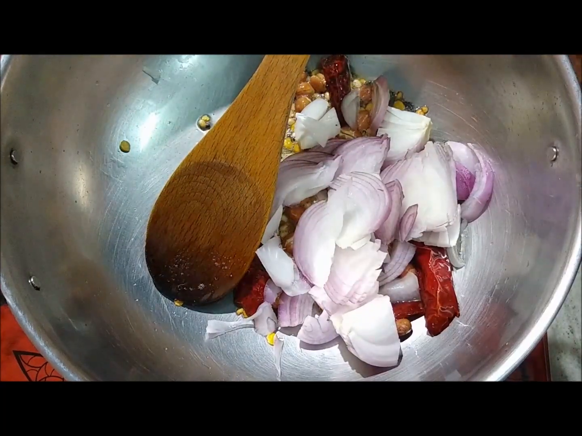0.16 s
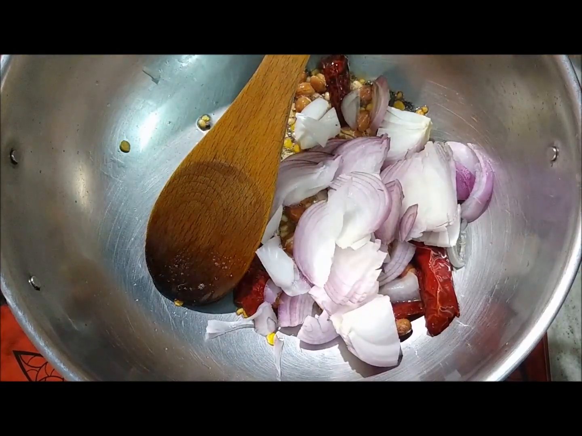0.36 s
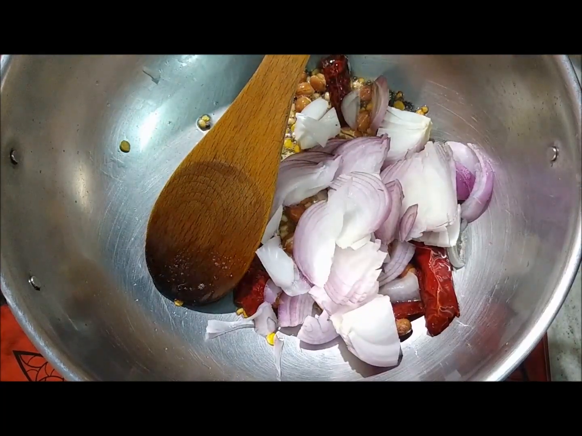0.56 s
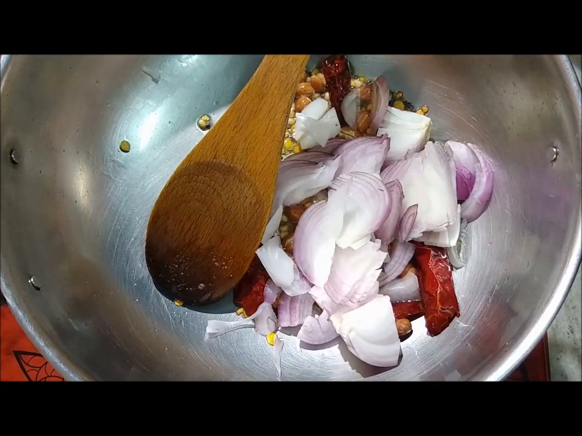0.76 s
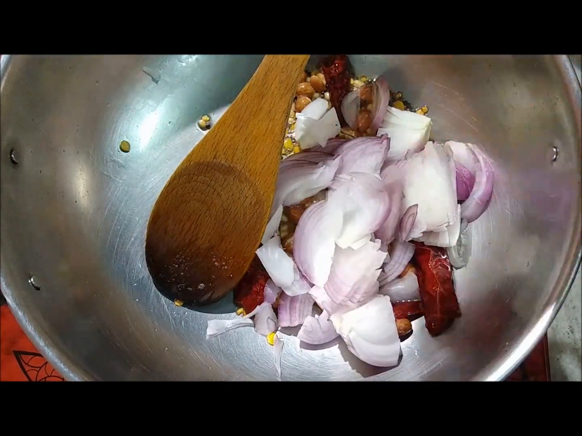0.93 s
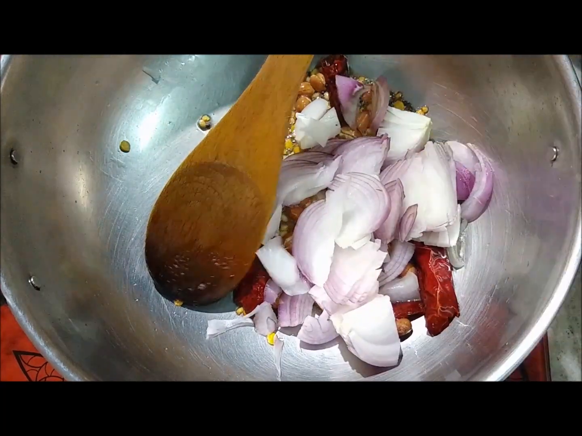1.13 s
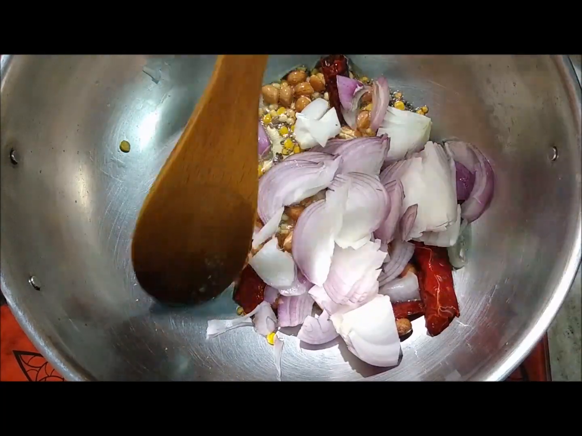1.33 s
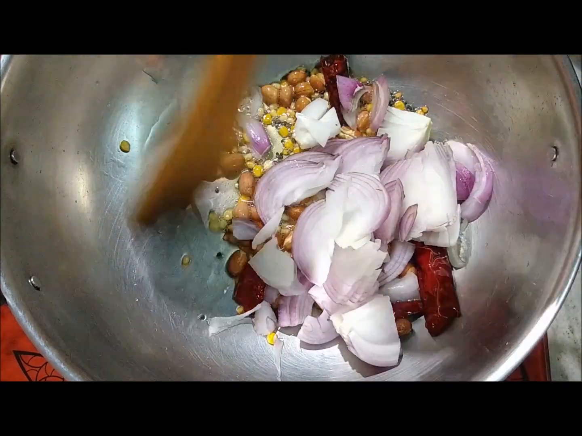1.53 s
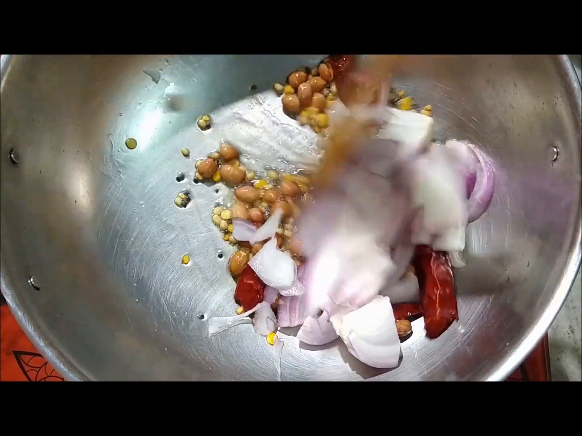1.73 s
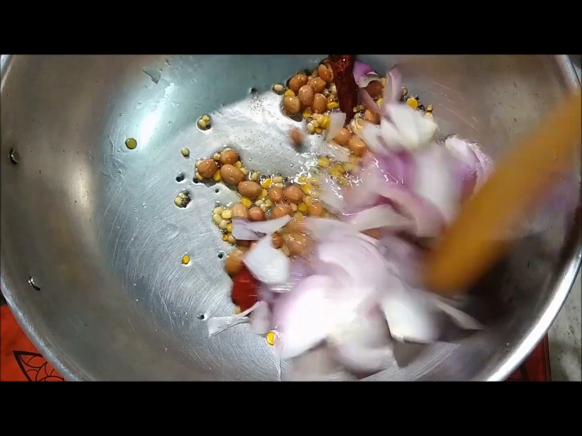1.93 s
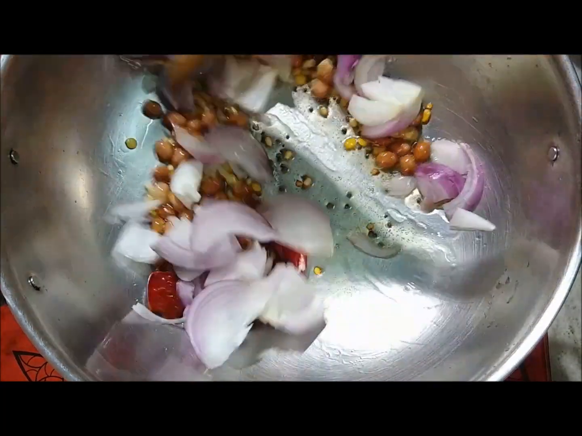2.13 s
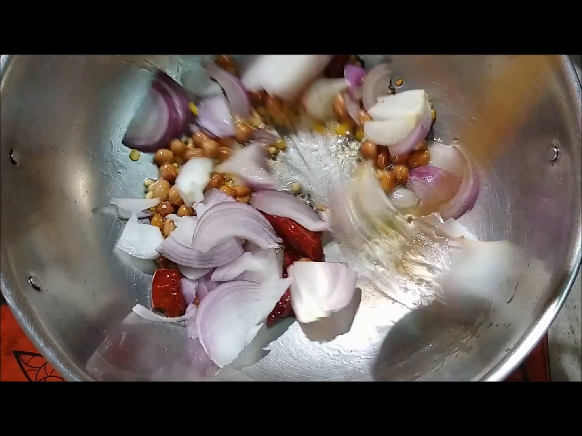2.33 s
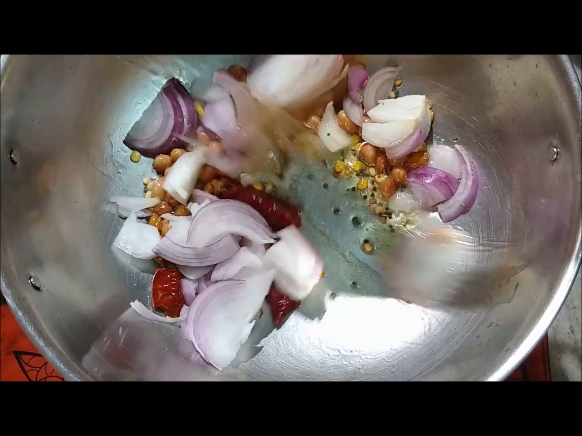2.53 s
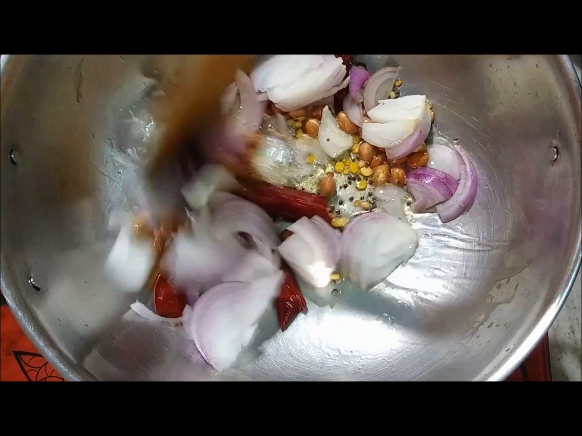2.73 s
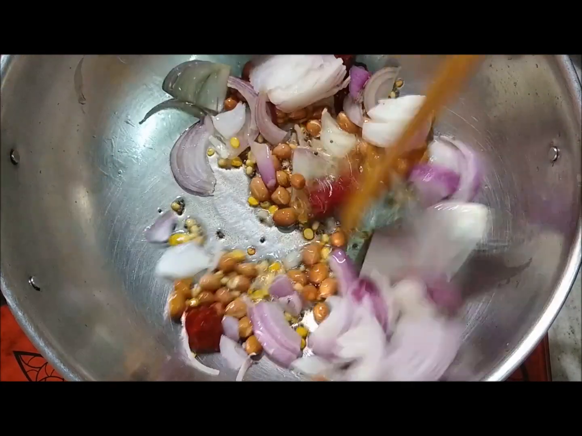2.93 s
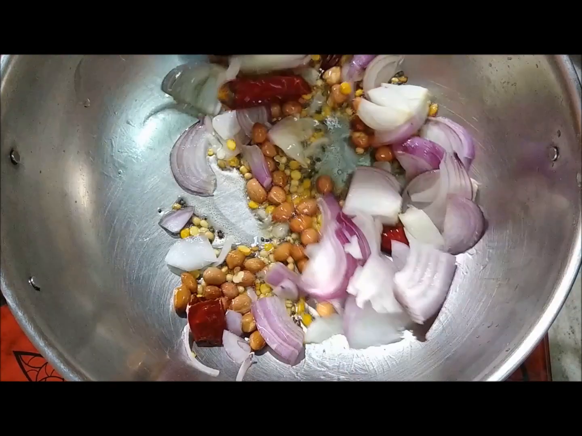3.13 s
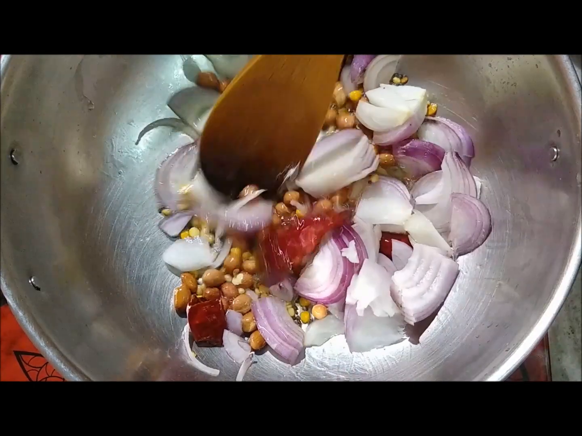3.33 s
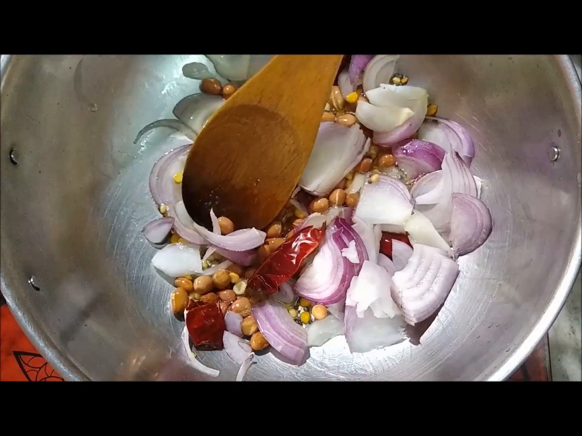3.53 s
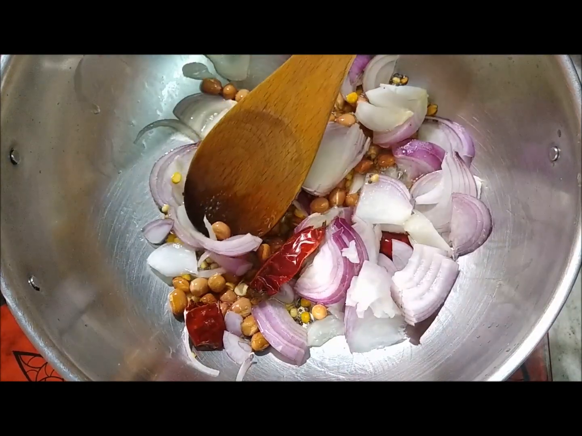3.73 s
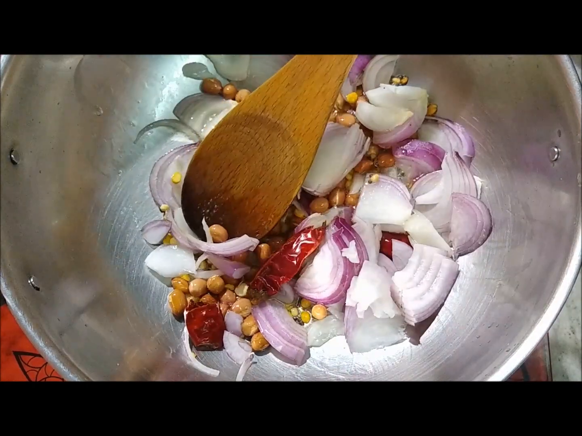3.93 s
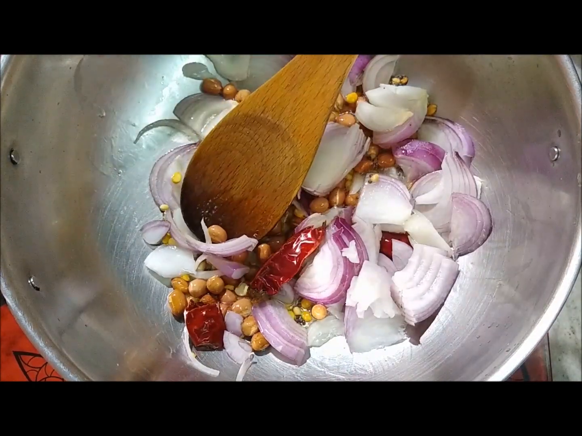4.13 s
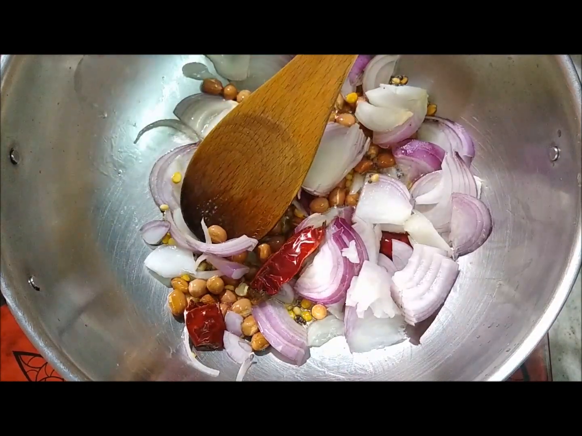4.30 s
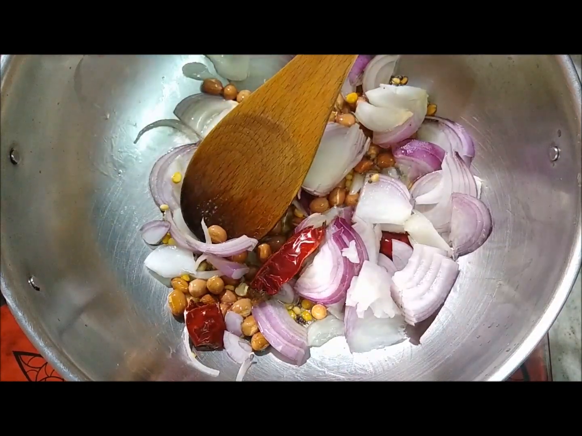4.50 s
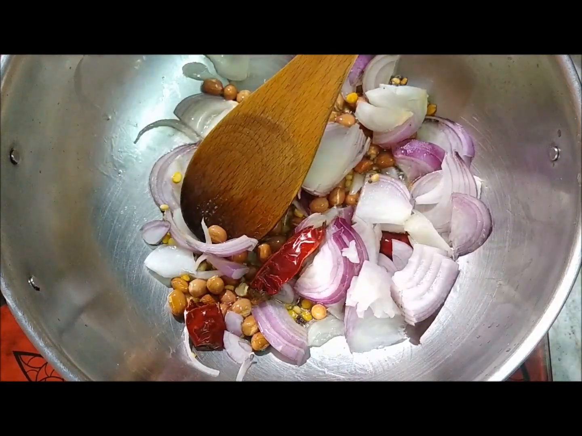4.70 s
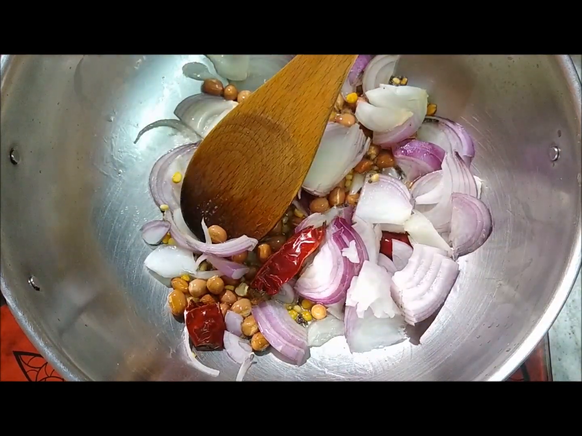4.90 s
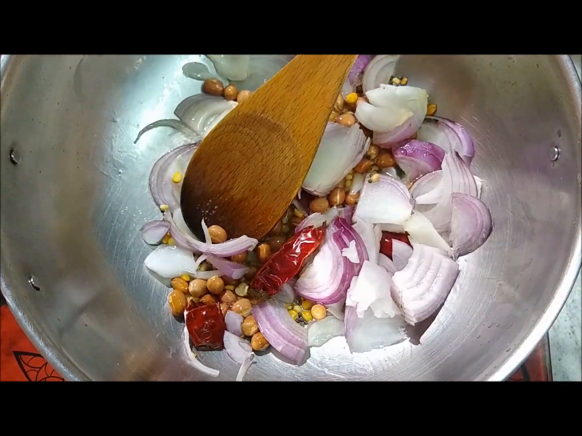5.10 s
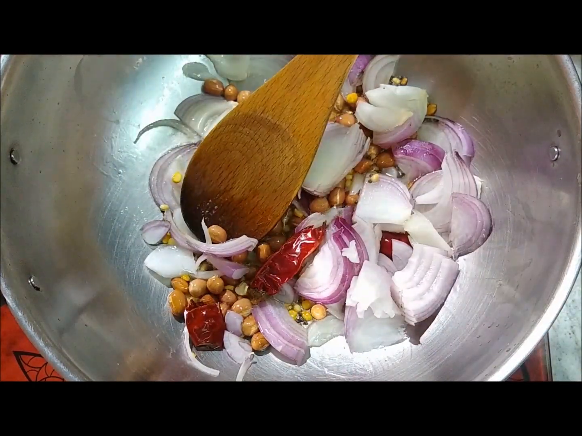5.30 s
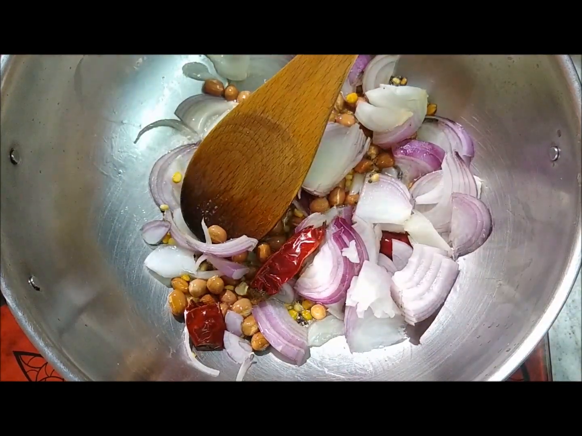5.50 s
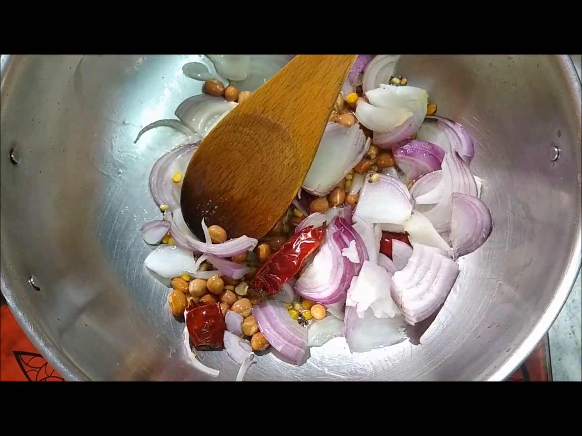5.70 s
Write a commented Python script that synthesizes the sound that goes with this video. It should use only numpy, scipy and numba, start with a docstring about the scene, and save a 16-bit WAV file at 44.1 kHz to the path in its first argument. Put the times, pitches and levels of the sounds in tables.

```python
"""Onions frying in a steel pan

Onions sizzle in hot oil just under a phone; a wooden spoon scrapes and knocks the pan while stirring.
Steam bubbles crackle and spit as damped sines; now and then one bursts as a pressure step with a thump.
Spoon contacts thud and set the pan modes ringing; loud peaks make the phone cut its gain, which creeps back.
Each channel is one port minus the other, delayed, so sounds cross over late and reversed; most come from
the right. A low murmur of burner and room lies underneath."""
import sys
import numpy as np
from scipy import signal
from scipy.fft import rfft, irfft, next_fast_len
from scipy.io import wavfile
from scipy.ndimage import uniform_filter1d
from numba import njit

SR = 44100
rng = np.random.default_rng(int(sys.argv[2]) if len(sys.argv) > 2 else 0)


def store_wav(level_fs):
    """Save 16-bit WAV to argv[1]."""
    pcm = np.round(np.clip(np.atleast_2d(level_fs), -1, 1) * 32767)
    wavfile.write(sys.argv[1], SR, pcm.T.astype(np.int16))


N = 253575

# ringing modes of the pan, low and high: (f/Hz, level/dB, t60/s)
LOW_MODES = [(325.3, -11, 0.22), (520, 1.5, 0.052), (639, -1, 0.038), (672, -6, 0.69), (753, -2, 0.083),
             (864, -7.5, 0.1), (925, -19.5, 0.083), (1310, -4.5, 0.13)]
HIGH_MODES = [(1567, -14, .12), (2062, -12, .2), (2620, -14, .1), (2945, -2, .22), (3009, -6, .25),
              (3203, -1, .2), (3245, -4, .15), (3300, -10, .15), (3390, -14, .1), (3758, -10, .15),
              (3908, -11, .15), (4750, -16, .1)]
LAG = 20  # samples by which sound from the right reaches the left port later


def frying():
    """Crackle over a seethe of tiny bubbles, fine hiss with flecks of spray, and the drone they raise in the pan."""
    # frying over time: (t/s, crackle level/dB, fine hiss over crackle/dB, pan drone over crackle/dB)
    fry = [(0, -55, -4, 17), (.04, -51, -16, 5.5), (.09, -57.5, -5, -14), (.125, -38, -13, -5),
           (.2, -51, -4, 0), (.3, -52, -1, -1), (.43, -46, -0.5, -8.5), (.6, -53.5, 2, -9),
           (.78, -49, 2, -7.5), (.9, -54.5, 4, -5.5), (1.2, -50.5, 1, -8), (1.55, -51.5, 1, -6),
           (1.7, -53.5, 8.5, -13), (1.83, -43.5, -13, 0), (1.9, -41.5, -1.5, -35), (2.07, -48, 1, -12.5),
           (2.34, -44.5, -0.5, -3.5), (2.55, -44, 1, -5.5), (2.7, -45, 0.5, -10.5), (2.95, -47, -3, -9.5),
           (3.2, -48, -1.5, -13), (3.55, -44, -2.5, -9), (3.75, -49, -1, -6), (4.2, -46.5, 1.5, -7),
           (4.4, -44.5, -3, -9.5), (5.15, -50, 0.5, -10), (5.75, -48, -0.5, -9)]
    # colour of the crackle: (f/Hz, level/dB)
    crackle_colour = [(900, -24), (1500, -11.5), (2100, -6.5), (2900, -0.5), (4000, -15.5), (5500, -0.5),
                      (8000, -13.5), (11000, -2.5)]
    # colour of the seethe: (f/Hz, level/dB)
    seethe_colour = [(450, -11.5), (700, 0.5), (1300, -11), (2100, 7), (2900, 1.5), (4200, 8.5),
                     (6000, -6.5), (9000, -23)]
    # colour of the hiss: (f/Hz, level/dB)
    hiss_colour = [(1500, -19.5), (3000, -1.5), (5000, -1), (8000, -5.5), (11000, -8), (14000, -6),
                   (15500, -10.5)]
    drone_colour = [(350, -21.5), (700, 5.0), (1300, 5.0), (1750, -4), (2300, -23)]
    crackle_db, hiss_db, drone_db = curves(fry)
    noise = rng.standard_normal((5, N))

    boil = crackle(count=5000, lo_hz=1120.0, hi_hz=9060.0, cycles=2.34, spread_db=4.0, scatter=3.0, clump_db=2.2)
    boil = unit(colour(boil, crackle_colour))

    seethe = ports(noise[0], 0.27, noise[1])
    seethe = unit(colour(seethe * undb(2.2 * walk(60) + 3.2 * walk(350)), seethe_colour))

    # about 380 flecks a second, each fading over 1.4 ms
    flecks = (rng.random(N) < 380 / SR) * undb(4.87 * rng.exponential(size=N).clip(0, 4))
    flecks = signal.lfilter([1], [1, -np.exp(-1 / (0.0014 * SR))], flecks)
    gate = undb(2.2 * walk(45)) + undb(-8.0) * flecks
    # spray lands all over the pan, so part of it is unrelated at the two ports
    mist = ports(noise[2], 0.25, noise[3]) + undb(1.) * rng.standard_normal((2, N))
    hiss = unit(colour(gate * mist, hiss_colour))

    shake = noise[4] * undb(3.1 * walk(50) + 3.3 * walk(250))
    drone = undb(-10.5) * unit(ring(shake, LOW_MODES)) + unit(colour(shake, drone_colour))

    wet = undb(-2.72) * boil + undb(-0.5) * seethe + undb(drone_db) * drone
    return undb(crackle_db + .5 * walk(20)) * (wet + undb(hiss_db) * hiss)


def crackle(count, lo_hz, hi_hz, cycles, spread_db, scatter, clump_db):
    """A swarm of small bubbles, a few louder, that come in clumps."""
    moment, pitch, loudness, place, lag_scatter, length = rng.random((count, 6)).T
    s = (40 + moment * (N - 140)) / SR
    clump = clump_db * walk(45)[(s * SR).astype(int)]
    db = -spread_db * np.log(loudness + 0.0036) + clump
    hz = lo_hz * (hi_hz / lo_hz) ** pitch
    left_share = .28  # bubbles that reach the left port first
    lag = LAG * np.sign(1 - left_share - place) + scatter * (lag_scatter - .5)
    return unit(bubbles(s, hz, cycles * (.5 + length), db, 8 * (place - .5), lag))


def bubbles(s, hz, cycles, db, pan_db, lag, glide=0.073, rise=2.8):
    """Damped sines at both ports; each bubble lies elsewhere in the pan, so has its own lag and balance."""
    # a bubble that swells in rings shorter and starts stronger
    open_share, swell_db = 0.71, 4.5
    decay = hz / SR / np.clip(open_share * cycles, .3, 40)
    left_size = -undb(db + swell_db + pan_db / 2)
    right_size = undb(db + swell_db - pan_db / 2)
    left = grains(N, s * SR + lag, hz, decay, left_size, glide, rise)
    right = grains(N, s * SR, hz, decay, right_size, glide, rise)
    return np.array([left, right])


@njit
def grains(n, at, hz, decay, size, glide, rise):
    """Damped sines that swell in quickly and rise in pitch, faster the shorter they ring."""
    y = np.zeros(n)
    for g in range(len(at)):
        start = int(at[g]) + 1
        w = 2 * np.pi * hz[g] / SR
        # starting between samples keeps the lag exact
        z = size[g] * np.exp((1j * w - decay[g]) * (start - at[g]))
        step = np.exp(1j * w - decay[g])
        turn = np.exp(1j * w * glide * decay[g])
        shut = 1.
        for k in range(start, min(n, start + int(6 / decay[g]))):
            shut *= 1 - min(rise * decay[g], 1.)
            y[k] += z.imag * (1 - shut)
            z *= step
            step *= turn
    return y


def spits():
    """Each loud bubble snaps open and rings a few cycles; each spray is a short burst of bright noise."""
    # loudest single bubbles: (t/s, level/dB, f/Hz, ring/cycles, left over right/dB)
    loud_bubbles = [(0.1168, -22, 3360, 1.4, -3), (0.369, -29.5, 2570, 5, 5),
                    (0.3879, -16, 1210, 0.38, -0.5), (1.07, -29.5, 3270, 1.2, -3),
                    (0.4215, -33, 1240, 0.5, 4), (0.635, -32, 5170, 2.2, 5), (0.661, -29, 7200, 3.9, 3),
                    (0.664, -31, 5200, 6, -1), (0.6872, -22, 1490, 0.38, 1), (0.693, -29, 5000, 0.99, 0),
                    (0.699, -28.5, 8000, 12, -3), (0.764, -34, 4000, 3, 3), (0.775, -25, 4630, 3, 0),
                    (0.876, -34, 5730, 6.6, -7), (1.1636, -29, 3440, 0.87, 3), (0.789, -23.5, 4450, 5.8, 4),
                    (1.056, -26.5, 3430, 0.97, 2), (1.135, -31.5, 1300, 4.2, -1),
                    (1.3485, -18, 2575, 5.7, 2.5), (1.3985, -12.5, 2580, 3.6, -0.5),
                    (1.8425, -18.5, 1400, 4.1, 2.5), (1.906, -18, 3000, 8.7, 4), (1.972, -23, 2960, 3, 4.5),
                    (1.951, -28, 3080, 8.4, 0), (1.9847, -20.5, 2520, 5.3, 0), (2.287, -29, 3420, 2.1, -5),
                    (2.3948, -20.5, 3600, 5.5, 6.5), (2.5398, -25, 5500, 7.2, -3),
                    (2.58, -26, 3760, 4.3, 1.5), (2.607, -30.5, 3760, 6.9, -9), (2.84, -29, 3360, 4.3, -3),
                    (3.542, -34, 3400, 1.5, 10), (3.578, -30, 3470, 4.4, 2), (3.5225, -35.5, 3100, 7.1, 1),
                    (3.973, -30, 6940, 4.5, -2), (4.152, -32.5, 1260, 0.71, 5),
                    (4.4854, -31, 2840, 1.1, 12), (4.518, -23, 6600, 1.8, -1), (4.526, -24, 6460, 2.7, -4),
                    (4.858, -34, 5500, 1.8, 4), (5.317, -34, 3463, 8.1, 0), (5.563, -30, 5600, 5.4, -8.5),
                    (3.1402, -23, 1387, 0.55, 0), (3.256, -31.5, 3120, 5.2, -7),
                    (3.454, -25, 3340, 2.8, -1), (3.57, -24.5, 3300, 1.6, -1.5), (3.629, -25, 3660, 2, -2),
                    (3.9571, -30, 2500, 2.9, -6), (4.1232, -26.5, 3450, 1.2, 3.5),
                    (4.255, -29, 2670, 3.4, -2.5), (4.4114, -29.5, 1330, 2.4, -5),
                    (4.55, -21.5, 980, 1, -1.5), (4.684, -33, 1410, 2, 3.5), (4.785, -29, 2830, 1.9, 5),
                    (4.9513, -22, 3160, 7.9, 3), (4.9927, -31, 3320, 6.1, -8.5),
                    (5.031, -23.5, 3970, 9.4, 5), (5.045, -28, 3350, 7.4, -3), (5.218, -33, 3200, 5.2, 1),
                    (5.273, -27, 3430, 3.3, -2), (5.3011, -26, 3320, 2.7, -1),
                    (5.3709, -15, 1970, 0.88, -2), (5.44, -24, 3500, 0.78, 1.5), (5.537, -28, 1160, 0.8, 0),
                    (5.625, -31, 3300, 4.4, -10), (5.7255, -26, 4000, 7.9, -1)]
    # loudest sprays of oil: (t/s, level/dB, left over right/dB)
    sprays = [(0.6913, -31, 0.5), (0.88, -27, 2), (1.017, -39.5, 10), (1.1516, -32, 6), (1.326, -36, 0),
              (1.351, -39, 8), (1.4544, -38, 1), (1.5026, -40, -3), (1.5725, -32.5, -4), (1.635, -34, 4),
              (1.6637, -29, 1), (1.7428, -23.5, 2.5), (2.122, -26.5, 4), (2.141, -34, 7),
              (2.4034, -21.5, -4), (2.453, -22, 8), (2.5005, -21.5, -8), (2.522, -28, 4), (2.643, -30, 2),
              (2.701, -26, 4), (2.826, -28.5, 9), (2.897, -33, -14), (3.0226, -36, 0), (3.626, -30, 6),
              (3.8515, -42, 6), (3.9584, -31, -7), (4.2712, -36, 13), (5.11, -27, 0), (5.3719, -30, -2),
              (5.439, -30.5, -2)]
    snap_colour = [(500, -24.5), (1200, -2.0), (4000, 2.5), (10000, -19.5)]
    spray_colour = [(1500, -39.5), (3500, 1.5), (5500, 7.0), (9000, -3.0), (15000, -1.5)]

    # smaller spits at random moments
    moment, pitch, length, place = rng.random((160, 4)).T
    stray_hz = 3600 * 6.9 ** (pitch ** 0.676 - .55)
    stray = [moment * (N - 500) / SR, np.full(160, -40.), stray_hz, 8.4 * (.5 + length), 8 * (place - .5)]
    s, db, hz, cycles, pan_db = np.hstack([np.transpose(loud_bubbles), stray])
    rings = bubbles(s, hz, cycles, db, pan_db, LAG + rng.standard_normal(len(s)))
    snaps = bursts(s, db - 8, 1, pan_db, snap_colour)

    s, db, pan_db = np.transpose(sprays)
    return rings + snaps + bursts(s, db, 0.89, pan_db, spray_colour)


def bursts(s, db, ms, pan_db, points):
    """Short decaying bursts of coloured noise, partly unrelated at the two ports."""
    gate = np.zeros((2, N + 400))
    fall = np.exp(-np.arange(380) * 1000 / SR / ms)
    for i, right, left in zip((s * SR).astype(int), db - pan_db / 2, db + pan_db / 2):
        gate[0, i + LAG:][:len(fall)] += undb(left) * fall
        gate[1, i:][:len(fall)] += undb(right) * fall
    noise = rng.standard_normal((2, N))
    return gate[:, :N] * unit(colour(ports(noise[0], 0.41, noise[1]), points))


def pops():
    """Steam bursts: a sudden step of pressure that leaks away; the port swings back with a low thump."""
    # steam bursts: (t/s, level/dB, push +1 or pull -1, fall/ms, thump over level/dB)
    steam_bursts = [(0.0163, -4, 1, 0.85, -5), (2.498, -23, 1, 0.44, 12), (2.6889, -10.5, 1, 0.57, 14),
                    (2.8267, -21.5, 1, 1, 19), (2.8974, -10.5, -1, 0.98, -23), (2.678, -30, 1, 1, 18),
                    (4.2713, -18.5, 1, 1.6, -25), (4.2735, -5.5, 1, 1.36, -3), (4.9122, -18.5, 1, 0.86, 16)]
    out, t = np.zeros(N), np.arange(3000) / SR
    for s, db, sign, fall_ms, thump_db in steam_bursts:
        jump = (1 - np.exp(-t / .00006)) * np.exp(-t * 1000 / fall_ms)
        thump = -.3 * undb(thump_db) * np.sin(2 * np.pi * 115 * t) * np.exp(-t / 0.0045)
        debris = 0.017 * rng.standard_normal(len(t)) * np.exp(-t / 0.0041)
        burst = 1.771 * jump + thump + dull(debris, 2260.0)
        out[int(s * SR):][:len(t)] += sign * undb(db) * burst
    # the port leaks slow pressure
    out = signal.sosfilt(signal.butter(2, 72., "high", fs=SR, output="sos"), out)
    left, right = ports(out)
    return np.array([undb(-4.0) * left, right])


def spoon():
    """Knocks and strokes of the wooden spoon; thuds, low ring and rumble reach both ports alike."""
    thud, low, high = knocks()
    rumble, rasp = scrapes()
    body = thud + low + rumble
    # wood on a thin pan moves no air at the lowest pitches
    body = signal.sosfilt(signal.butter(4, 135., "high", fs=SR, output="sos"), body)
    return body + ports(ring(high, HIGH_MODES)) + rasp


def knocks():
    """Wood thuds while it touches, the pan rings on; returns thud, low ring and the taps for the clang."""
    # spoon on pan: (t/s, thud level/dB, thud f/Hz, contact/ms, ring over thud/dB, clang over thud/dB)
    contacts = [(1.399, -49, 910, 1.6, -23, 6), (1.6, -32.5, 402, 1.3, -20, -35),
                (1.651, -33.5, 387, 1.3, -33.5, -38), (1.684, -45, 675, 0.46, 9, 7),
                (1.8425, -14, 531, 2.9, -12.5, -48), (1.8495, -17, 655, 3.8, -38.5, -40.5),
                (1.868, -14.5, 688, 3.6, -25, -10.5), (1.913, -23, 720, 3.8, -38, -18),
                (1.939, -40, 600, 2.2, -26, -32), (2.101, -37.5, 361, 23, -35.5, -9),
                (2.319, -43, 833, 8.8, -9, -11.5), (2.3944, -9.5, 723.3, 9.6, -19, -46),
                (2.595, -13.5, 675, 1.3, -25, -32.5), (2.850, -20.5, 644.4, 1.1, -17.5, -38),
                (3.111, -38, 630, 2.7, -7, -46), (3.802, -37.5, 691, 18.6, -18, -36)]
    near_db_per_octave = 38  # a knock rings most the modes near its own pitch
    thud, low, high, t = np.zeros(N), np.zeros(N), np.zeros(N), np.arange(4000) / SR
    tap = 1. * (np.arange(SR // 2) == 0)
    for s, db, hz, touch_ms, ring_db, clang_db in contacts:
        i, touch = int(s * SR), touch_ms / 1000
        attack = np.clip(t / (0.00049 + 0.42 * touch), 0, 1) ** 0.51
        release = np.exp(-np.clip(t - touch, 0, 1) / 0.0017)
        chatter = 1 + .6 * dull(rng.standard_normal(len(t)), 500.)
        tone = np.sin(2 * np.pi * hz * t) + undb(-19.5) * np.sin(2 * np.pi * 2.06 * hz * t)
        thud[i:i + len(t)] += undb(db) * attack * release * chatter * tone
        near = [(f, d - near_db_per_octave * abs(np.log2(f / hz)), t60) for f, d, t60 in LOW_MODES]
        low[i:i + len(tap)] += undb(db + ring_db) * ring(tap, near)
        high[i] += undb(db + clang_db)
    return thud, low, high


def scrapes():
    """Dragging is uneven friction into the pan modes, with wood noise below and metal rasp above."""
    wood_colour = [(110, -8.0), (300, 3.5), (800, -3.5), (1600, -10.5), (2600, -29.0)]
    rasp_colour = [(900, -7.0), (3000, -3.5), (6000, -17), (12000, -34.0)]
    drag, drag_rasp = strokes()
    slip_db = 4 * walk(150) + 1.5 * walk(40)  # the spoon sticks and slips
    grit = rng.standard_normal((4, N)) * undb(slip_db)
    wood = unit(colour(grit[1], wood_colour))
    rumble = unit(ring(grit[0], LOW_MODES)) + undb(1.0) * wood
    metal = ports(grit[2], 0.39, grit[3])
    rasp = unit(ring(metal, HIGH_MODES)) + undb(11.0) * unit(colour(metal, rasp_colour))
    return drag * rumble, drag_rasp * rasp


def strokes():
    """Each stroke bites quickly, holds, then fades; returns the strength of rumble and of rasp."""
    # spoon dragged through the food: (t/s, rumble level/dB, hold/s, metal rasp over rumble/dB)
    drags = [(1.604, -54, 0.073, -32), (1.672, -62.5, 0.061, 3), (1.839, -31, 0.0051, -17.5),
             (1.863, -38, 0.037, -4.5), (2.084, -46, 0.032, -13), (2.13, -55.5, 0.14, -15.5),
             (2.3, -53, 0.16, -10), (2.378, -47, 0.015, -7.5), (2.593, -38.5, 0.016, -16),
             (2.833, -41.5, 0.013, -21.5)]
    attack_s, fade_db_per_s = 0.0045, 158
    s, db, hold, rasp_db = np.transpose(drags)[..., None]
    since = np.arange(N) / SR - s
    fade_db = fade_db_per_s * np.clip(since - hold, 0, 2)
    drag = np.clip(since / attack_s, 0, 1) * undb(db - fade_db)
    return drag.sum(axis=0), (drag * undb(rasp_db)).sum(axis=0)


def kitchen():
    """Low murmur of burner and room, unrelated at the two ports, and a faint low tone that comes and goes."""
    # colour of the murmur: (f/Hz, level/dB)
    murmur_colour = [(25, -25), (45, -29.5), (63, 2.5), (95, -36), (150, 0), (220, -10.5), (350, -5),
                     (600, -12), (1200, -19.5)]
    # faint low tones: (t/s, f/Hz, length/s, level/dB)
    hums = [(0.142, 316, 0.35, -57), (2.583, 302, 0.5, -56), (5.047, 363, 0.19, -60),
            (5.402, 380, 0.042, -55.5)]
    murmur = unit(colour(rng.standard_normal((2, N)), murmur_colour))
    out = undb(-61.5 + 0.75 * walk(16.0)) * murmur
    time = np.arange(N) / SR
    waver = 1.2 * walk(70)  # radians
    for s, hz, length, db in hums:
        swell = np.sin(np.pi * np.clip((time - s) / length, 0, 1))
        out += undb(db) * swell * np.sin(2 * np.pi * hz * time + waver)
    return out


def ring(push, modes):
    """A push sets each mode ringing: one damped complex resonator per mode."""
    out = 0
    for hz, db, t60 in modes:
        pole = np.exp(2j * np.pi * hz / SR - np.log(1000) / (t60 * SR))
        out = out + undb(db) * signal.lfilter([1], [1, -pole], push).imag
    return out


def ports(x, apart=0., other=0.):
    """Sound from the right reaches the left late and reversed; a share from the left crosses the other way."""
    apart = np.clip(apart, 0, 1)
    from_right = np.sqrt(1 - apart) * x
    from_left = np.sqrt(apart) * other * np.ones_like(x)
    left = from_left - np.roll(from_right, LAG, axis=-1)
    right = from_right - np.roll(from_left, LAG, axis=-1)
    return np.array([left, right])


def undb(db):
    """Decibels to amplitude."""
    return 10 ** (np.asarray(db) / 20)


def unit(x):
    """Scale to an RMS of one."""
    return x / np.sqrt(np.mean(x ** 2))


def curves(table):
    """Columns joined by straight lines in time."""
    s, *columns = np.transpose(table)
    return [np.interp(np.arange(N) / SR, s, c) for c in columns]


def colour(x, points):
    """Filter by (Hz, dB) points on a log axis; the level drops 20.5 dB below the lowest point."""
    size = next_fast_len(N)
    hz, db = np.transpose(points)
    axis = np.log(np.arange(size // 2 + 1) * SR / size + 1)
    gain = undb(np.interp(axis, np.log(hz), db, left=db[0] - 20.5))
    return irfft(rfft(x, size) * gain, size)[..., :N]


def walk(rate):
    """Random levels held 1 / rate s and slewed twice."""
    k = int(SR / rate)
    held = np.repeat(rng.standard_normal(N // k + 1), k)
    return 1.15 * uniform_filter1d(uniform_filter1d(held, k), k)[:N]


def dull(x, hz):
    """Take the treble off."""
    return signal.sosfilt(signal.butter(2, hz, fs=SR, output="sos"), x)


def gain_control(x):
    """A peak over the knee cuts the gain a moment later; it creeps back at a steady rate."""
    knee_db, cut_db_per_db, rise_db_per_s, late_s = -9.5, 2.3, 11.5, 0.019
    creep = rise_db_per_s * np.arange(N) / SR
    peak_db = 20 * np.log10(np.abs(x).max(axis=0) + 1e-9)
    want = cut_db_per_db * np.clip(peak_db - knee_db, 0, None)
    cut = np.maximum.accumulate(want + creep) - creep
    late = int(late_s * SR)
    smooth_cut = uniform_filter1d(np.append(np.zeros(late), cut), late)[:N]
    return x * undb(-smooth_cut)


def scene():
    """Spits, spoon and bursts with a short echo, over the frying and the kitchen."""
    hits, bangs = spits() + spoon(), pops()
    t = np.arange(9000) / SR
    # bowl of the pan and nearby walls: a short dull tail that arrives from both sides
    tail = dull(rng.standard_normal((2, len(t))), 8400.0) * undb(-60 * t / 0.16) * np.clip(t / .009, 0, 1)
    echo = signal.fftconvolve((hits + undb(-11.0) * bangs)[1:], tail, axes=1)[:, :N]
    return hits + bangs + undb(-33.0) * ports(echo[0], 0.383, echo[1]) + frying() + kitchen()


def record(dry):
    """The ports differ in colour and treble timing; gain control, then electronic rumble and a steep top cut."""
    # colour of the left port over the right: (f/Hz, level/dB)
    left_colour = [(60, 3), (250, -0.5), (700, 0.76), (2400, 0.9), (5000, -0.6), (8000, 3), (12000, 0),
                   (15000, -3)]
    rumble_colour = [(35, -12.5), (60, -5.5), (150, -6), (400, -14.5)]
    size = next_fast_len(N)
    hz = np.arange(size // 2 + 1) * SR / size
    # the left treble falls behind by a part of a sample
    treble_lag = np.interp(hz, (8500, 10500), [0, .8])
    late = np.exp(-2j * np.pi * hz / SR * treble_lag)
    # a point at 1 Hz holds the lowest level down to the bottom
    left = colour(dry[0], [(1, left_colour[0][1])] + left_colour)
    left = irfft(rfft(left, size) * late, size)[:N]
    both = gain_control(np.array([left, dry[1]]))
    rumble = unit(colour(rng.standard_normal((2, N)), rumble_colour))
    top_cut = signal.ellip(10, .2, 80, 15500, fs=SR, output="sos")
    return signal.sosfilt(top_cut, both + undb(-64.5) * rumble)


dry = scene()
out = record(dry)
store_wav(out)
```